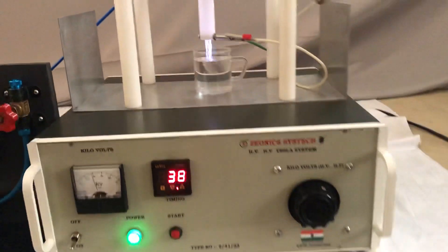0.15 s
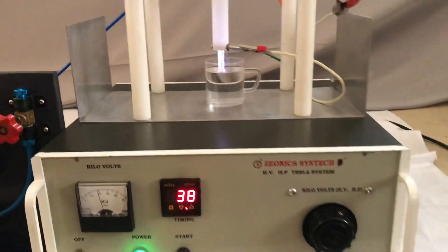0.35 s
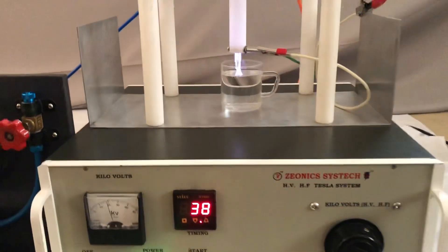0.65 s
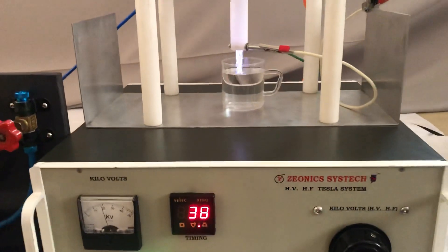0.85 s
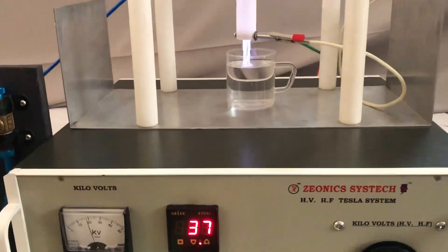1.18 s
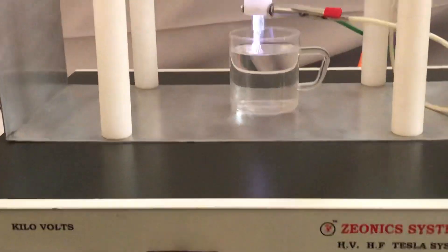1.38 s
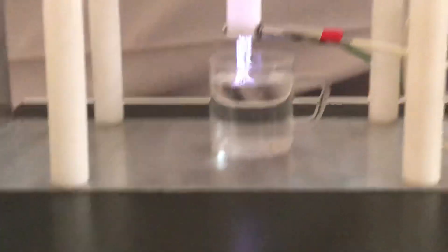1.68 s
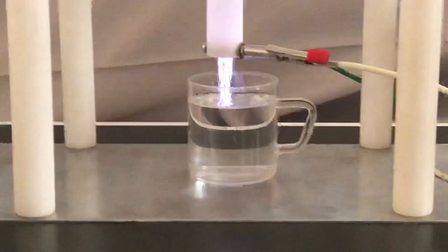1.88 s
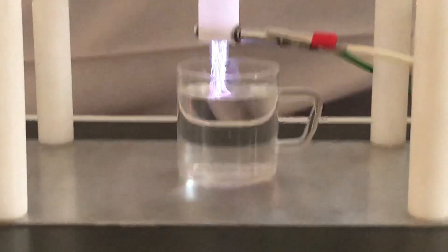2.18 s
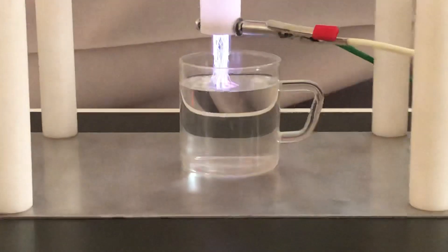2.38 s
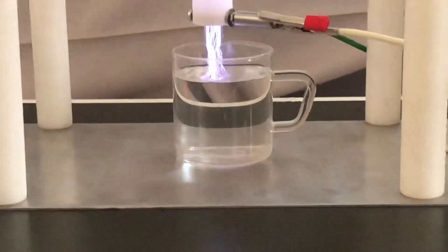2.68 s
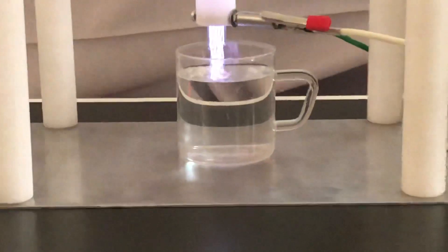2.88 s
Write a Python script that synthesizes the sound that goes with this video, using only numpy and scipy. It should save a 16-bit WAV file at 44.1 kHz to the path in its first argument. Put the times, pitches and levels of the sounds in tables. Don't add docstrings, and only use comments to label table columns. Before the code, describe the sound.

A plasma jet plays on water in a glass cup: continuous bright crackling hiss and a piercing very high whine, briefly cutting out and relighting with ticks, over faint fan hum in a small lab, close phone microphone.

```python
import sys
import numpy as np
from scipy import signal
from scipy.io import wavfile
from scipy.ndimage import uniform_filter1d

SR = 44100
rng = np.random.default_rng(int(sys.argv[2]) if len(sys.argv) > 2 else 0)


def convert_level_to_amplitude(level_db):
    exponent = np.asarray(level_db, float) / 20
    return 10 ** exponent


def dump(signal):
    limited = np.clip(np.atleast_2d(signal).T, -1, 1)
    pcm = np.round(limited * 32767).astype(np.int16)
    wavfile.write(sys.argv[1], SR, pcm)


N = 134505

WALLS_DB, WALLS_T60 = -15, .1
RIPPLE_HZ = 100.

# (time [s], rate [Hz], level [dB])
FIRING = [(0, 13536, -30.5), (.3, 13535, -28.5), (.6, 13533, -28.5), (.9, 13532, -28.5), (1.2, 13531, -29),
          (1.5, 13528, -29.5), (1.75, 13526, -30.5), (2, 13528, -29.5), (2.2, 13527.5, -28.5),
          (2.45, 13527, -27), (2.7, 13527, -29), (3.05, 13526, -29)]
# (frequency [Hz], gain [dB])
WHINE_PATH = [(12000, -8), (13200, -7), (13350, 1), (13480, 1), (13600, -1.5), (13850, 0), (14100, -5),
              (16000, -8)]


def whine():
    wander_hz, wander_db, wander_rad = 130, 3.4, .33
    sway_hz, sway_rad = 12, .2
    sag_db = np.minimum(wander_db * np.maximum(drift(wander_hz) ** 2 - .5, 0), 9)
    turns = np.cumsum(curve(FIRING, column=1)) / SR
    waver = wander_rad * drift(wander_hz) + sway_rad * drift(sway_hz)
    line = np.sqrt(2) * evened(convert_level_to_amplitude(-sag_db)) * np.sin(2 * np.pi * turns + waver)
    return coloured(burning(WALLS_DB) * line, WHINE_PATH)


# (relight time [s], length [s], depth [dB])
DROPOUTS = [(0.0551, 0.0039, -8.0), (0.0775, 0.008, -11.0), (0.0952, 0.004, -9.0), (0.1865, 0.0048, -12.0),
            (0.2250, 0.0119, -24.0), (0.255, 0.005, -4), (0.6558, 0.005, -11.0), (0.8051, 0.004, -6.0),
            (1.0113, 0.009, -8.0), (1.1845, 0.0125, -11.0), (1.2636, 0.010, -13.0), (1.3738, 0.0042, -9.0),
            (1.9528, 0.0098, -16.0), (1.9598, 0.003, -7), (2.048, 0.005, -10.0), (2.5081, 0.005, -8.0),
            (2.526, 0.0025, -6.0), (2.7963, 0.0035, -10.0), (2.8264, 0.0035, -9.0), (2.8873, 0.0036, -8.0)]


def burning(walls_db):
    die_s, relight_s, deepen = .002, .0002, 1.5
    overshoot_db, overshoot_s = 2.5, .003
    t = np.arange(N) / SR
    db = curve(FIRING, column=2) + .9 * np.sin(2 * np.pi * (RIPPLE_HZ * t + .3))
    for relight, length, depth_db in DROPOUTS:
        dying = (t - relight + length) / die_s + .5
        relighting = (relight - t) / relight_s
        db = db + deepen * depth_db * np.clip(np.minimum(dying, relighting), 0, 1)
        db = db + overshoot_db * (t > relight) * np.exp(-abs(t - relight) / overshoot_s)
    power = convert_level_to_amplitude(2 * db)
    r = convert_level_to_amplitude(-120 / (WALLS_T60 * SR))
    reflected = signal.lfilter([1 - r], [1, -r], power)
    return np.sqrt(power + convert_level_to_amplitude(2 * walls_db) * reflected)


# (frequency [Hz], level [dB])
CRACKLE = [(1500, -31), (4000, -27), (6000, -19), (8500, -15), (11000, -16.5), (13000, 2.5), (15300, 0),
           (15720, -5.5)]
# (frequency [Hz], width [Hz], gain [dB])
NOZZLE = [(7050, 600, 11), (7480, 200, 5), (7900, 250, 2), (8350, 200, 4), (8550, 150, -3), (8900, 300, -2),
          (9820, 750, 9.5), (12700, 900, -1.5), (13750, 300, 3), (14100, 200, -3), (14400, 220, 5),
          (14750, 250, -4.5), (15220, 300, 3.5), (15620, 200, -4)]
# (time [s], crackle level [dB], gas level [dB])
ROAR = [(0, 0, 0.5), (.25, 0, 0.5), (.6, -0.5, 1), (1, 1.5, 0.5), (1.25, 1, 0.5), (1.45, 1.5, 1),
        (1.8, 1, 1), (1.9, 1.5, 0.5), (2.15, 0.5, 0.5), (2.45, -0.5, 1.5), (2.75, 0, 0), (3.05, 0.5, 1.5)]


def crackle():
    snaps_per_s, flicker_hz = 1500, 60
    snaps = convert_level_to_amplitude(3.5 * np.minimum(rng.exponential(1, N), 4)) * (rng.random(N) < snaps_per_s / SR)
    drive = rng.standard_normal(N) * (1 + convert_level_to_amplitude(-11) * evened(snaps))
    drive = drive * convert_level_to_amplitude(.3 * drift(flicker_hz))
    below_8k = signal.sosfiltfilt(signal.butter(4, 8000, fs=SR, output="sos"), drive)
    below_12k = signal.sosfiltfilt(signal.butter(4, 11800, fs=SR, output="sos"), drive)
    ranges = (below_8k, below_12k - below_8k, drive - below_12k)
    flame = evened(burning(walls_db=-8))
    drive = sum(part * flame ** share * convert_level_to_amplitude(1.7 * drift(flicker_hz))
                for part, share in zip(ranges, (.3, .7, 1)))
    return convert_level_to_amplitude(-31 + curve(ROAR, column=1)) * evened(coloured(drive, CRACKLE, NOZZLE))


# (time [s], level [dB], pitch [Hz])
STRAYS = [(0.2254, -35, 2470), (0.7746, -48, 3150), (0.9125, -39, 3020), (1.1648, -44, 3040),
          (1.1854, -28.5, 2570), (1.347, -34.5, 2460), (1.4263, -36, 2330), (1.9262, -35, 2500),
          (1.954, -33, 2300), (2.086, -37, 2470), (2.156, -35, 3020), (2.797, -31, 2940),
          (2.825, -44, 3100), (2.845, -50, 3030)]
# (frequency [Hz], level [dB], t60 [s])
TICK = [(2150, -3, .014), (2350, -1, .016), (2546, 1, .018), (2900, 1, .02), (3138, 0, .025),
        (3515, -8, .012)]


def ticks():
    grain_hz, reach_db_per_khz = 3130, 20
    t, out = np.arange(4000) / SR, np.zeros(N)
    for s, db, pitch in STRAYS:
        ring = np.zeros(len(t))
        for hz, mode_db, t60 in TICK:
            far_db = reach_db_per_khz * abs(hz - pitch) / 1000
            ring += convert_level_to_amplitude(mode_db - far_db - 60 * t / t60) * np.sin(2 * np.pi * hz * t)
        grain = evened(uniform_filter1d(rng.standard_normal(len(t)), size=120))
        tail = convert_level_to_amplitude(-13 - 60 * t / .3) * grain * np.sin(2 * np.pi * grain_hz * t)
        ring += tail * (pitch / grain_hz) ** 6
        out[round(s * SR):][:len(t)] += convert_level_to_amplitude(db) * ring * np.minimum(t / .0002, 1)
    return out


# (time [s], level [dB])
SPITS = [(0.0762, -28), (0.2099, -39), (0.2253, -25), (0.4394, -36), (0.4594, -35), (0.4883, -25),
         (0.5965, -36), (0.7337, -36), (0.8599, -30), (1.1493, -33), (1.1847, -21), (1.2087, -36),
         (1.271, -30), (1.3728, -29), (1.4356, -28), (1.5888, -37), (1.7469, -34), (1.9599, -27),
         (2.156, -28), (2.361, -35), (2.796, -28), (2.834, -33)]


def spits():
    t, out = np.arange(4000) / SR, np.zeros(N)
    for s, db in SPITS:
        tones = sum(np.sin(2 * np.pi * (9800 * k * t + rng.random())) for k in rng.uniform(.96, 1.04, 3))
        out[round(s * SR):][:len(t)] += convert_level_to_amplitude(db - 6.5 - 60 * t / .014) * tones * np.minimum(t / .0006, 1)
    return out


# (frequency [Hz], level [dB])
GAS = [(900, -12.5), (1500, -9.5), (2300, -0.5), (3300, -2.5), (3900, -6.5), (5500, -11), (7000, -6.5),
       (15000, -18)]
# (frequency [Hz], width [Hz], gain [dB])
CUP = [(1920, 240, 7), (2150, 50, 2.5), (2360, 90, 2.5), (2500, 180, 2), (2880, 110, 5), (3130, 150, 5),
       (3350, 80, 1.5), (4250, 130, 9), (4600, 200, 8), (4850, 100, 5), (5620, 200, 2), (6400, 400, 4),
       (7120, 700, 7)]


def gas():
    gust_db = .5 * drift(36)
    return convert_level_to_amplitude(-44.5 + curve(ROAR, column=2) + gust_db) * evened(coloured(rng.standard_normal(N), GAS, CUP))


# (time [s], pitch [Hz], level [dB])
SONG = [(0, 1900, -49), (.2, 1920, -52.5), (.5, 1940, -52), (.85, 1890, -52), (1.05, 1907, -46.5),
        (1.25, 1890, -53), (1.42, 1890, -45), (1.6, 1894, -50.5), (1.78, 1900, -46.5), (1.88, 1960, -53),
        (2.1, 1935, -46), (2.25, 1910, -45.5), (2.4, 1906, -48), (2.65, 1930, -49.5), (3.05, 1893, -51)]


def song():
    pitch = curve(SONG, column=1) + 12 * drift(2.8)
    note = evened(resonate(rng.standard_normal(N), pitch, width=130))
    return convert_level_to_amplitude(curve(SONG, column=2) + 0.38 * drift(10)) * note


# (time [s], pitch [Hz], level [dB])
WHISTLE = [(0, 6900, -67), (.22, 6770, -57), (.3, 7200, -50), (.8, 6870, -55), (1.3, 7300, -55),
           (1.6, 7000, -59), (1.73, 7120, -47), (1.9, 7130, -55), (2.1, 7020, -49), (2.25, 7120, -44.5),
           (2.42, 7250, -56), (2.62, 7280, -46.5), (2.8, 7080, -49), (3.05, 7350, -53)]


def whistle():
    pitch = curve(WHISTLE, column=1) + 70 * drift(5.1)
    breath = evened(resonate(rng.standard_normal(N), pitch, width=380))
    return convert_level_to_amplitude(curve(WHISTLE, column=2) + 1.5 * drift(20)) * breath


# (time [s], level [dB])
CORE = [
    (0, -71),
    (.2, -68),
    (.3, -51),
    (.7, -48.5),
    (1.35, -49.5),
    (1.8, -53),
    (2.4, -51.5),
    (3.05, -50),
]
# (ripple multiple, level re core [dB])
SIDEBANDS = [
    (-1, -19),
    (1, -5),
    (2, -14),
]


def core():
    t = np.arange(N) / SR
    turns = np.cumsum(curve(FIRING, column=1)) / SR / 2
    tones = np.sin(2 * np.pi * turns)
    for multiple, db in SIDEBANDS:
        tones = tones + convert_level_to_amplitude(db + 0.68 * drift(3.3)) * np.sin(2 * np.pi * (turns + multiple * RIPPLE_HZ * t))
    return np.sqrt(2) * convert_level_to_amplitude(curve(CORE, column=1)) * tones


# (frequency [Hz], level [dB])
ROOM = [(15, -57), (25, -37), (64, -16), (102, -5.5), (253, -4.5), (384, -5), (706, -10.5), (840, -9.5),
        (1600, -15), (2080, -12), (3520, -120)]
# (frequency [Hz], width [Hz], gain [dB])
FANS = [(173, 33, 1.3), (183, 21, 4.1), (376, 79, 1.4), (607, 78, 5.2), (714, 46, 7.7)]
# (frequency [Hz], width [Hz], level [dB])
HUM = [
    (99.6, 3.7, -55.5),
    (126.1, 4.5, -62.5),
]
# (time [s], rumble level [dB], moan level [dB])
RUMBLE = [(0, -3.5, -50), (.2, -4.5, -62), (.32, 5, -48), (.7, 3.5, -61), (.85, 2.5, -66), (1.0, -4, -79),
          (1.15, -5.5, -74), (1.25, 2.5, -78), (1.55, 3, -62), (1.85, 2, -60), (2.1, -0.5, -66),
          (2.55, 1, -54.5), (2.8, 2, -47.5), (3.05, -2.5, -63)]


def room():
    t = np.arange(N) / SR
    wash = convert_level_to_amplitude(-45.5 + 0.098 * drift(0.67)) * evened(coloured(rng.standard_normal(N), ROOM + [(5000, -84)], FANS))
    hum = sum(convert_level_to_amplitude(db - 1 + 2.5 * drift(3 * width)) * np.sin(2 * np.pi * hz * t + .7 * drift(width))
              for hz, width, db in HUM)
    low = signal.sosfilt(signal.butter(2, 220, fs=SR, output="sos"), wash)
    moan = convert_level_to_amplitude(curve(RUMBLE, column=2) + 1) * np.sin(2 * np.pi * 396 * t + 1.4 * drift(15))
    load = convert_level_to_amplitude(curve(RUMBLE, column=1))
    return wash + moan + (load - 1) * low + np.sqrt(2) * hum * load


def walls(x):
    t = np.arange(SR // 4) / SR
    tail = rng.standard_normal(len(t)) * convert_level_to_amplitude(-60 * t / WALLS_T60) * (t > .002)
    return signal.oaconvolve(x, tail / np.linalg.norm(tail))[:N]


# (frequency [Hz], width [Hz], gain [dB])
PLATE = [(2090, 60, -2), (2240, 80, -2), (2715, 130, -12), (2980, 55, -6), (3280, 60, -2), (3780, 200, -6),
         (4080, 150, -3), (4420, 110, -6), (4950, 110, -6), (5150, 70, -2), (5830, 130, -7),
         (6630, 100, -2), (7640, 110, -6), (8030, 80, -2)]


def off_plate(x):
    return coloured(x, [(1, 0), (SR, 0)], PLATE)


def evened(x):
    return x / np.sqrt(np.mean(x ** 2) + 1e-20)


def shape_db(points, bumps, hz):
    f, db = np.transpose(points)
    line = np.interp(np.log(hz + 1), np.log(f), db)
    return line + sum(gain / (1 + (2 * (hz - centre) / width) ** 2) for centre, width, gain in bumps)


def coloured(x, points, bumps=()):
    log_gain = np.log(convert_level_to_amplitude(shape_db(points, bumps, np.fft.rfftfreq(8192, 1 / SR))))
    circle = np.r_[log_gain, log_gain[-2:0:-1]]
    response = np.exp(np.conj(signal.hilbert(circle)))
    return signal.oaconvolve(x, np.fft.ifft(response).real[:4096])[:N]


def drift(hz):
    r = np.exp(-2 * np.pi * abs(hz) / SR)
    return evened(signal.lfilter([1], [1, -r], uniform_filter1d(rng.standard_normal(N), size=30)))


def curve(table, column):
    columns = np.transpose(table)
    return np.interp(np.arange(N) / SR, columns[0], columns[column])


def resonate(x, hz, width):
    turn = np.exp(2j * np.pi * np.cumsum(hz) / SR)
    r = np.exp(-np.pi * width / SR)
    return (turn * signal.lfilter([1], np.convolve([1, -r], [1, -r]), x / turn)).real


def scene():
    snaps = ticks() + spits()
    near = crackle() + snaps + convert_level_to_amplitude(-18) * walls(snaps) + gas() + song() + whistle()
    return (whine() + off_plate(near) + core() + room())[None]


def band_limit(x):
    return signal.sosfilt(signal.butter(12, 15750, fs=SR, output="sos"), x)


def record(dry):
    thin = signal.sosfilt(signal.butter(2, 45, "high", fs=SR, output="sos"), dry)
    return band_limit(thin)


dry = scene()
out = record(dry)
dump(out)
```